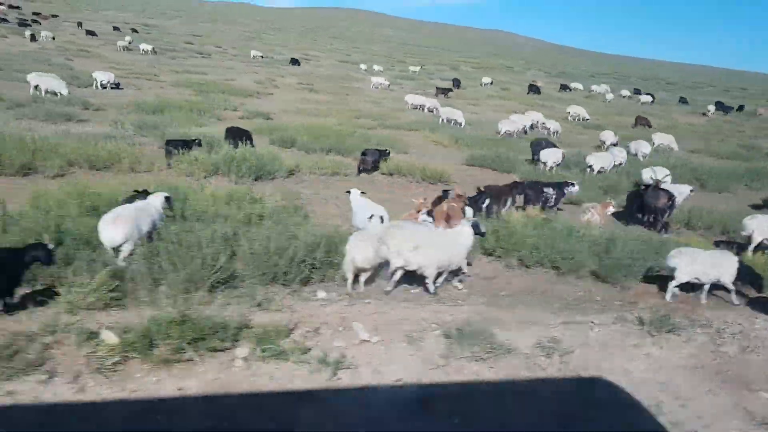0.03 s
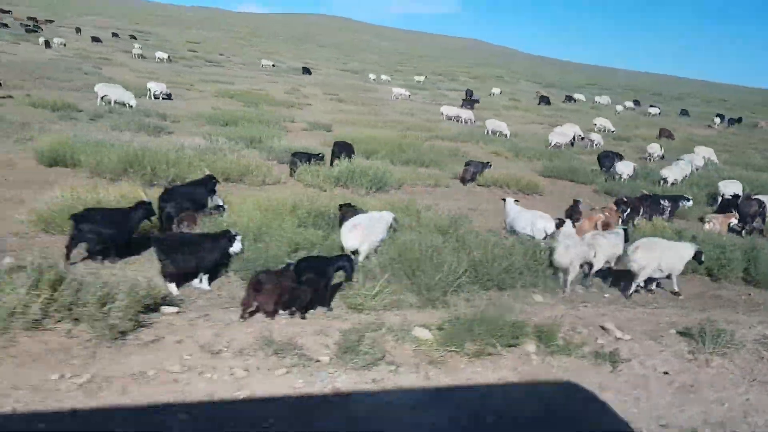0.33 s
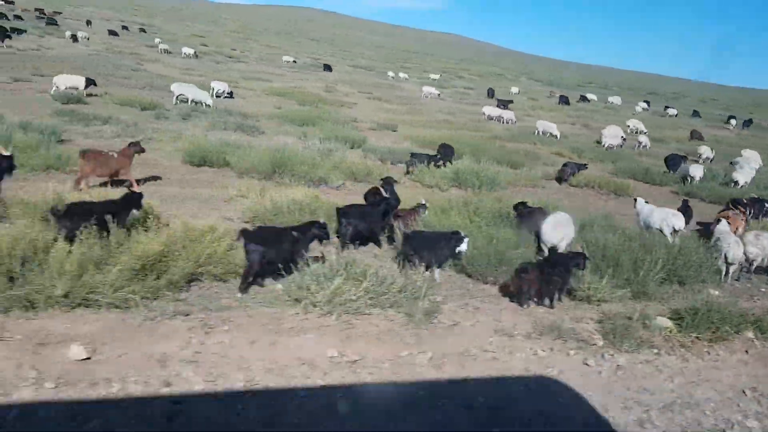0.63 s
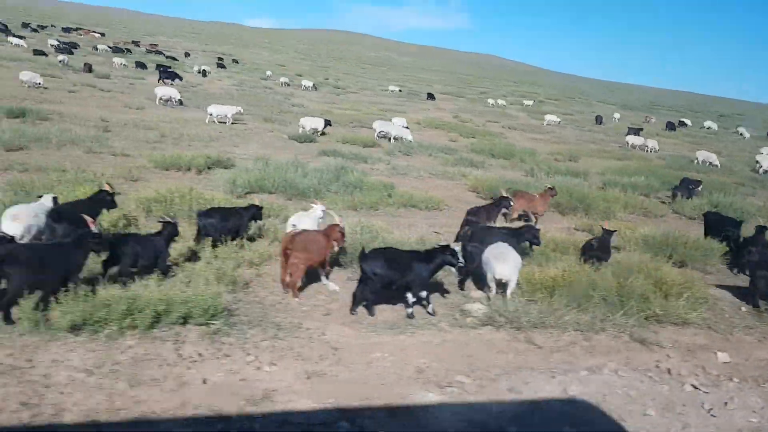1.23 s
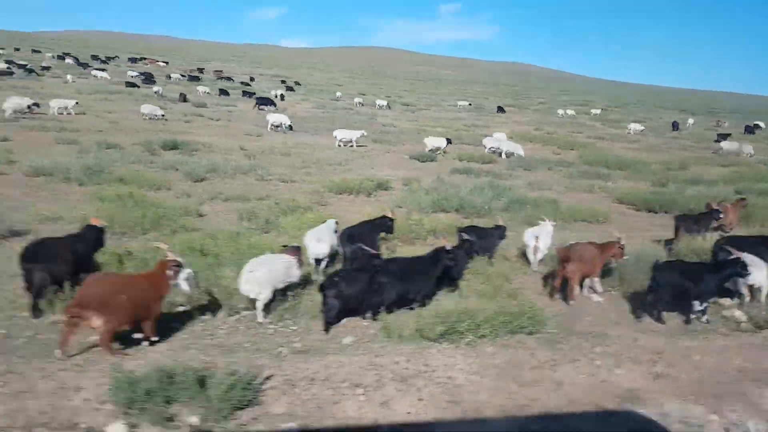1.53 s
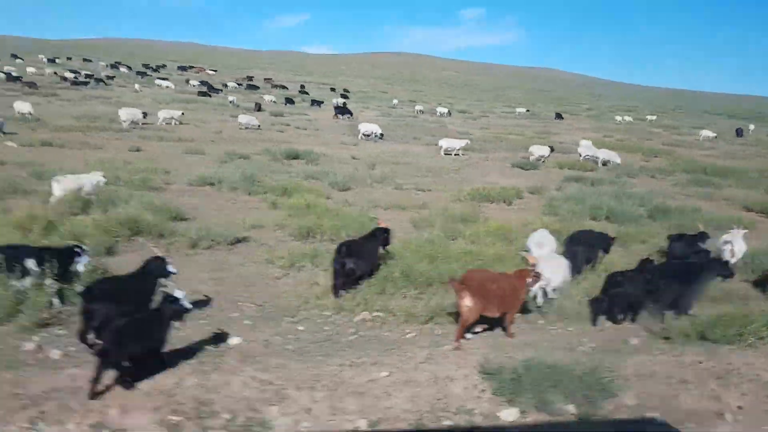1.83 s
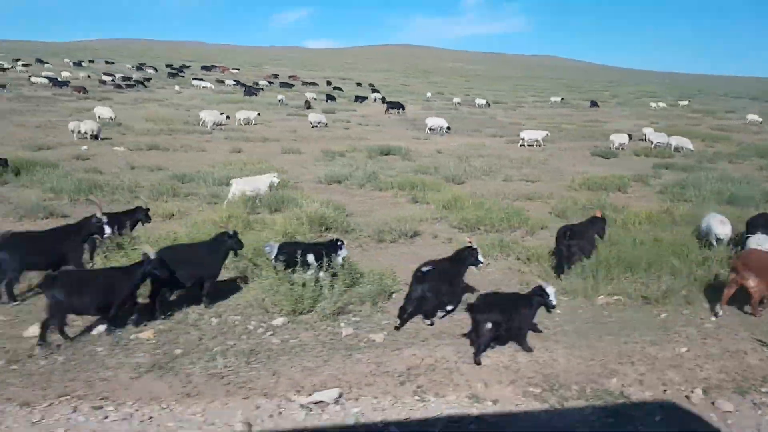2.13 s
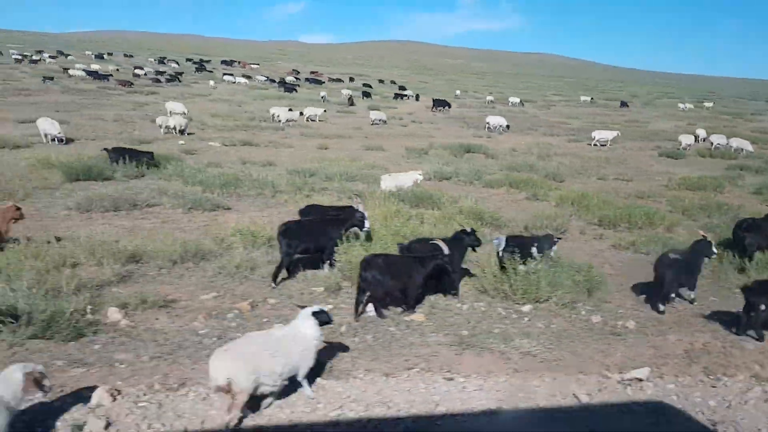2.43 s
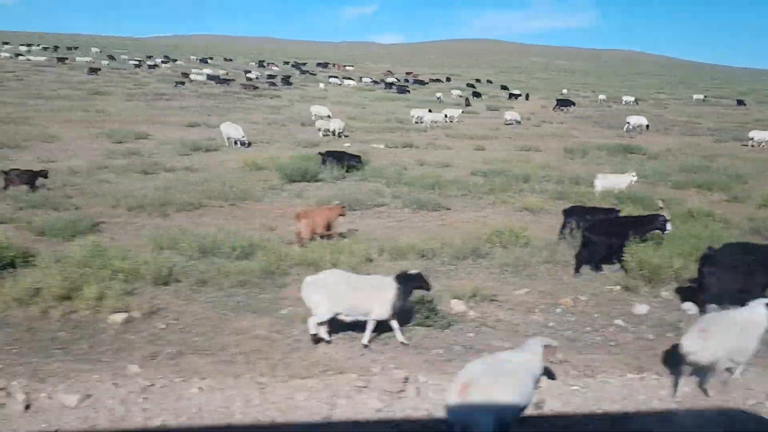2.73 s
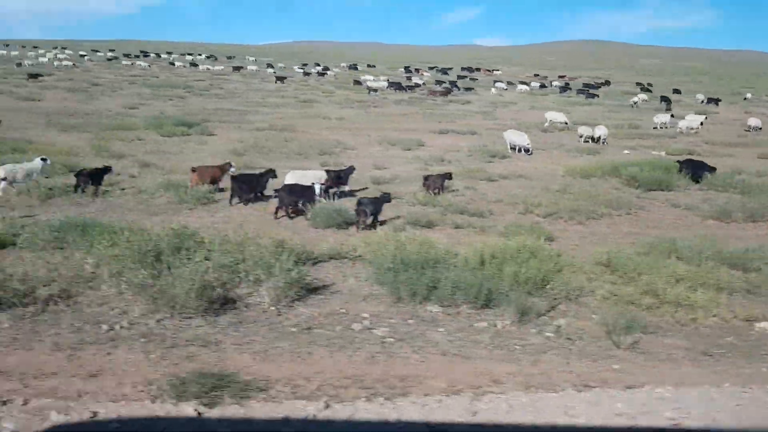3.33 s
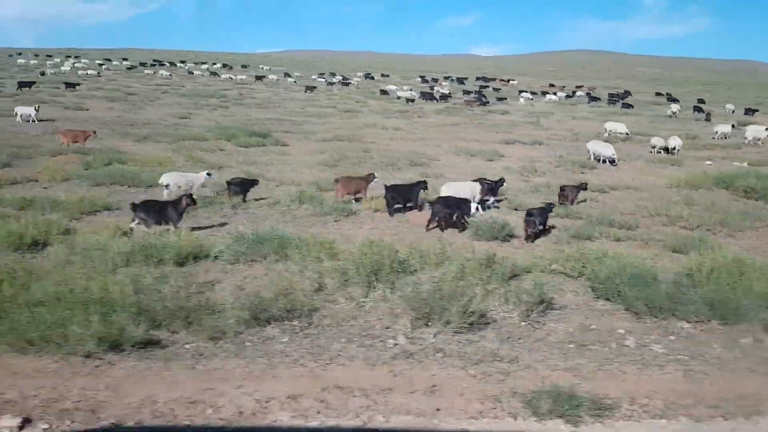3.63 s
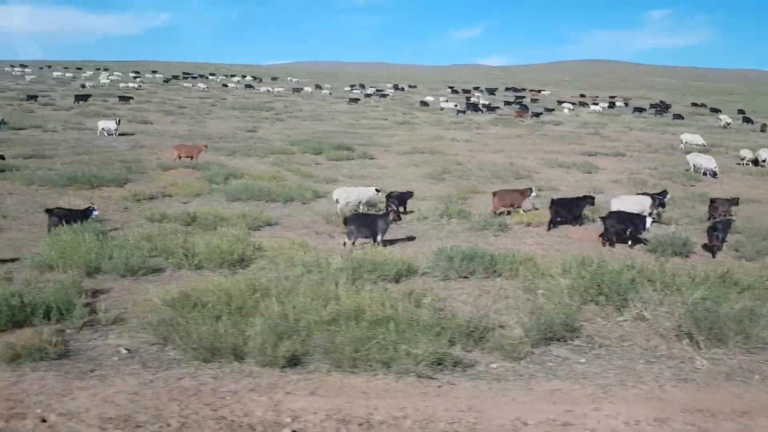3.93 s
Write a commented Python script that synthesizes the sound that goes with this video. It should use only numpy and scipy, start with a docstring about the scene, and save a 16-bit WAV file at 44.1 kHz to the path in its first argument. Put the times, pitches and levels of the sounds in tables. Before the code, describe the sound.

Low, booming rumble inside a car rolling over rough dirt, with light rattles and pops.

```python
"""Inside a car rolling slowly along a dirt track, the side window open on a pasture.
Ruts force the cabin air into a booming resonance and shake the body panels; air buffets the window.
The tyres roar and thud on stones, the suspension judders, and gearing and engine hum faintly.
Loose trim ticks and squeaks over a hiss of grit. Close to the microphone there are a few rustles,
and pressure steps at its ports make small pops and one sharp click."""
import sys
import numpy as np
from scipy import signal
from scipy.io import wavfile

SR = 44100
rng = np.random.default_rng(int(sys.argv[2]) if len(sys.argv) > 2 else 0)


def wav_out(sig):
    """Save sig, one row per channel (or a flat mono array), as 16-bit PCM at SR to the path in sys.argv[1]."""
    wavfile.write(sys.argv[1], SR, np.round(np.clip(np.atleast_2d(sig).T, -1, 1) * 32767).astype(np.int16))


N = 176400
T = np.arange(N) / SR

# Spectra give relative level per hertz; balance is left minus right.
# drive of the cabin boom by the ruts: t/s, level/dB
BOOM_LEVEL = [(0.04, -9.5), (0.05, -23), (0.53, -23), (0.69, -13), (0.77, -21.5), (0.85, -16.5),
              (0.91, -25.5), (0.93, -15.5), (1.2, -25), (1.36, -9), (1.39, -23), (1.5, -13.5),
              (1.55, -25.5), (1.62, -17), (2.08, -24), (2.16, -15.5), (2.3, -32), (2.33, -16.5),
              (2.61, -28), (2.64, -16), (2.68, -24), (2.83, -18), (2.95, -22.5), (2.97, -21.5),
              (3.16, -24.5), (3.21, -22.5), (3.24, -31.5), (3.33, -14), (3.36, -33), (3.53, -19),
              (3.6, -40.5), (3.71, -19), (3.74, -18), (3.96, -21)]
# centre of the boom, shifting with rut spacing: t/s, f/Hz
BOOM_PITCH = [(0, 82.3), (.35, 80.63), (.55, 73.1), (.78, 71.67), (.95, 76.35), (1.2, 81.36), (1.36, 68.23),
              (1.65, 69.3), (1.85, 66.5), (2.12, 86.18), (2.35, 79.57), (2.55, 78.27), (2.8, 81.16),
              (3.05, 77.4), (3.3, 77.14), (3.5, 82.2), (3.75, 89.66), (4, 75.2)]
# steady shaking of the panels: t/s, level/dB
PANEL_LEVEL = [(0, -25.5), (.5, -24.5), (.95, -25), (1.15, -24.5), (1.4, -24), (1.8, -25), (2.1, -26),
               (2.3, -28), (2.55, -27), (2.72, -27.5), (2.84, -29.5), (3.14, -27), (3.5, -26.5),
               (3.62, -31), (3.8, -27), (4, -25)]
# panel spectrum: f/Hz, level/dB
PANEL_SPECTRUM = [(60, -20.5), (90, 7.5), (115, -2), (150, -6), (200, -9.5), (255, -13.5), (325, -12),
                  (410, -24.5), (520, -35.5), (900, -72)]
# jolts on deep ruts: centre t/s, length/s, level/dB
JOLTS = [(0.13, 0.042, -28), (0.311, 0.094, -23.5), (0.722, 0.18, -30), (0.983, 0.11, -27.5),
         (1.561, 0.048, -23.5), (1.985, 0.038, -27), (2.412, 0.093, -23), (2.67, 0.043, -25.5),
         (2.979, 0.08, -21.5), (3.234, 0.053, -19.5), (3.319, 0.04, -23), (3.718, 0.027, -16),
         (3.822, 0.069, -25), (3.952, 0.047, -21)]
# jolt spectrum: f/Hz, level/dB
JOLT_SPECTRUM = [(75, -13.5), (105, -3), (150, 3), (195, -8), (255, -16.5), (330, -21.5), (500, -34.5)]
# buffeting at the window: f/Hz, level/dB
BUFFET_SPECTRUM = [(15, 1.5), (24, -5.5), (31, -9.5), (40, -4.5), (50, -11), (70, -27.5), (140, -41)]
# tyre roar: t/s, level/dB
ROAR_LEVEL = [(0, -31.5), (.7, -34.5), (1.4, -35), (2.1, -38), (2.6, -38.5), (2.87, -40.5), (3.5, -41),
              (4, -39)]
# roar spectrum: f/Hz, level/dB
ROAR_SPECTRUM = [(150, 15), (350, -1.5), (500, 0.5), (680, -4), (850, -8), (1100, -18.5), (1600, -37.5),
                 (3000, -33.5)]
# rough ground: centre t/s, length/s, groan level/dB, clatter level/dB
ROUGH_PATCHES = [(0.374, 0.15, -34.5, -45), (0.788, 0.039, -34, -40.5), (1.334, 0.033, -47.5, -46.5),
                 (1.57, 0.082, -30.5, -44), (1.856, 0.11, -34, -40.5), (2.245, 0.15, -33.5, -43),
                 (2.72, 0.13, -35, -40), (3.032, 0.057, -29.5, -41.5), (3.261, 0.057, -33.5, -42.5),
                 (3.737, 0.11, -33, -51)]
# low chassis modes: f/Hz, bandwidth/Hz, relative level/dB
GROAN_MODES = [(267, 31, -2.5), (319, 40, 1)]
# high chassis modes: f/Hz, bandwidth/Hz, relative level/dB
CLATTER_MODES = [(695, 26, 2.5), (799, 70, 4), (935, 50, -5.5), (1088, 110, -7), (1370, 36, -16.5)]
# stones under the tyres: t/s, level/dB
THUDS = [(0.261, -42), (0.706, -35.5), (0.778, -36), (1.328, -38), (3, -49)]
# thud spectrum: f/Hz, level/dB
THUD_SPECTRUM = [(250, 8.5), (550, 8), (850, -9.5), (1300, -5), (2500, -17)]
# knocks on the microphone: t/s, step level/dB, edge f/Hz, port (0 left, 1 right)
POPS = [(.009, -1.5, 1310, 1), (.0113, -17, 1600, 1), (.0272, -7.5, 5050, 1), (.0433, -4, 2030, 1),
        (.264, -8.5, 1930, 1), (.705, -10, 1800, 1), (1.7915, -12, 1500, 1), (1.8175, -5.5, 1674, 1),
        (2.12, -13.5, 1500, 1), (3.195, -12, 1400, 1), (3.2095, -12.5, 2530, 1), (2.6651, -4.5, 8000, 0)]
# gear whine, following road speed: t/s, f/Hz, level/dB
WHINE = [(0, 345.7, -41), (.3, 350.9, -38.5), (.62, 358.8, -34), (.8, 360.3, -39.5), (1.1, 361.4, -42.5),
         (1.5, 365, -47), (2.2, 362.3, -53), (3, 358.3, -54), (3.7, 355.5, -50.5), (4, 370.8, -44)]
# drone of the pulling engine: t/s, level/dB
DRONE_LEVEL = [(0, -35.5), (.45, -37.5), (.7, -32), (1.0, -32.5), (1.2, -34), (1.6, -45.5), (4, -46)]
# engine partials: ratio to the whine's frequency, relative level/dB
DRONE_PARTIALS = [(.317, 0.5), (.392, -3.5), (.572, -3.5), (1.59, -22.5), (1.87, -25.5)]
# ticks of loose trim: t/s, level/dB, balance/dB
TICKS = [(0.322, -40, 5), (.459, -50, 5), (.523, -37.5, 6), (0.551, -41, 2), (0.613, -43, -2),
         (0.654, -42, 0), (0.703, -49, -12), (.760, -43, 1), (0.855, -45.5, 4), (0.942, -48, 2),
         (1.078, -41, 9), (1.28, -46, 6), (1.671, -42, -5), (2.038, -41, -12), (2.488, -45, 15),
         (2.77, -40.5, -4), (3.117, -48, -10), (3.406, -46, 0)]
# tick spectrum: f/Hz, level/dB
TICK_SPECTRUM = [(500, -18), (1500, -1.5), (2500, 9), (4000, 0), (5800, -4), (8000, -5.5), (10000, -14.5),
                 (13000, -25), (17000, -17.5)]
# rubs beside the microphone: centre t/s, length/s, level/dB, balance/dB
RUSTLES = [(0.03, 0.023, -45, -19), (1.066, .04, -60.5, 14), (1.788, 0.1, -46, -2.5),
           (1.954, 0.027, -42.5, -23), (2.087, 0.082, -50, -3), (3.15, 0.03, -58, 5), (3.307, .015, -49, 0),
           (3.361, 0.033, -40, -15), (3.925, 0.049, -44, -7)]
# rustle spectrum: f/Hz, level/dB
RUSTLE_SPECTRUM = [(500, 1), (1000, -4.5), (1600, 0), (2300, 8.5), (3400, -12), (4800, -3), (7000, -24.5),
                   (9500, -18), (13000, -32.5), (17000, -40.5)]
# squeaks of seals and springs: centre t/s, length/s, f/Hz, level/dB
SQUEAKS = [(0.084, 0.0088, 3270, -52), (.145, 0.021, 3550, -58), (.28, .012, 3380, -59),
           (0.869, 0.024, 4250, -57.5), (.98, 0.015, 3050, -57), (3.153, 0.018, 6800, -61),
           (3.754, 0.098, 547, -42), (3.89, 0.016, 3110, -49.5)]
# hiss of grit: t/s, level/dB
HISS_LEVEL = [(0, -47.5), (.48, -51.5), (.6, -51), (1.08, -50.5), (1.15, -57), (1.24, -51), (1.3, -47),
              (1.42, -54), (1.5, -49.5), (1.87, -53), (1.91, -52.5), (2.2, -53.5), (2.46, -49), (2.55, -59),
              (2.63, -49.5), (2.87, -56), (2.96, -53.5), (3.1, -51), (3.27, -54.5), (3.5, -50.5),
              (3.56, -58.5), (3.68, -49.5), (3.85, -50.5), (4, -54.5)]
# hiss spectrum: f/Hz, level/dB
HISS_SPECTRUM = [(600, -12.5), (1200, 2.5), (1700, 2), (2250, 1.5), (3200, -7), (4200, -11.5), (5300, -13),
                 (7000, -21), (9000, -21), (12000, -32), (17000, -31.5)]
# even rush of air: f/Hz, level/dB
AIR_SPECTRUM = [(3500, -0.5), (5300, -1), (7000, -6.5), (9000, -6.5), (12000, -15.5), (17000, -15)]
# likeness of left and right noise: f/Hz, correlation
CORRELATION = [(30, 0.99), (100, 0.93), (180, 0.98), (340, 0.65), (700, 0.013), (1400, 0), (2800, 0),
               (5600, 0), (11000, 0.046)]
# sideways lean of the cabin noise: f/Hz, balance/dB
BALANCE = [(30, -2), (130, -0.5), (330, -2), (500, 4), (750, 5), (1200, -1.5), (2200, -2.5), (4500, 1.5),
           (9000, 5.5)]
# colouring by the microphone ports: f/Hz, gain/dB, Q
PORT_COLOUR = [(9100, -10.5, 1.27), (12700, 7.5, 3.1)]

LOW_BALANCE_DB = -2  # boom, groan and drivetrain lie slightly to the right


def from_db(db):
    """Amplitude ratio for a level in decibels."""
    return 10 ** (np.asarray(db) / 20)


def unit_rms(x):
    """Normalisation to unit mean power."""
    return x / np.sqrt(np.mean(x ** 2) + 1e-20)


def in_time(rows):
    """Linear interpolation of each column at every sample."""
    times, *columns = np.transpose(rows)
    return [np.interp(T, times, column) for column in columns]


def at_hz(points, hz):
    """Interpolation on a logarithmic frequency axis."""
    f, value = np.transpose(points)
    return np.interp(np.log(hz), np.log(f), value)


def pan(db):
    """Constant-power left and right gains for a level difference."""
    return unit_rms(from_db(np.array([[db], [-db]]) / 2))


def drift(corner_hz):
    """Random wander of unit rms: noise through a two-pole low-pass."""
    hop, settle = 40, 2000  # samples per step, steps discarded
    pole = np.exp(-2 * np.pi * corner_hz * hop / SR)
    white = rng.standard_normal(N // hop + settle + 2)
    slow = signal.lfilter([1], [1, -2 * pole, pole * pole], white)[settle:]
    return np.interp(np.arange(N) / hop, np.arange(len(slow)), unit_rms(slow))


def noise(spectrum, flicker_db, flicker_hz):
    """Partly correlated stereo noise of unit rms, in third-octave bands whose levels flicker."""
    edges = 14 * 2 ** (np.arange(32) / 3)
    white = rng.standard_normal((2, 2, N + SR // 2))
    shared, out = drift(flicker_hz), 0
    for k, (low, high) in enumerate(zip(edges, edges[1:])):
        hz, own = np.sqrt(low * high), drift(flicker_hz)
        if not spectrum[0][0] <= hz <= spectrum[-1][0]:
            continue
        bandpass = signal.butter(2, [low, high], "band", fs=SR, output="sos")
        mid, side = signal.sosfilt(bandpass, white[k % 2])[:, -N:]
        alike = at_hz(CORRELATION, hz)
        band = np.sqrt(1 + alike) * mid + np.sqrt(1 - alike) * side * [[1], [-1]]
        gain = from_db(at_hz(spectrum, hz) + flicker_db * (shared + own))
        out = out + gain * pan(at_hz(BALANCE, hz)) * band
    return unit_rms(out)


def swell(centre, length):
    """Gaussian envelope; the length spans two standard deviations."""
    return np.exp(-2 * ((T - centre) / length) ** 2)


def resonate(x, modes, detune=1):
    """Superposition of steep-skirted resonances, all detuned by one ratio; unit rms."""
    out = 0
    for hz, width, db in modes:
        b, a = signal.iirpeak(hz * detune, hz / (1.5 * width), fs=SR)
        out = out + from_db(db) * signal.lfilter(b, a, signal.lfilter(b, a, x + 1e-18))
    return unit_rms(out)


def cabin_boom():
    """Cavity resonance: road shocks keep the cabin air booming in a narrow, restless low band."""
    wander_hz, compression, gain_db = 18.7, 0.49, 1.35
    phase = 2 * np.pi * np.cumsum(in_time(BOOM_PITCH)[0]) / SR
    ring = (drift(wander_hz) + 1j * drift(wander_hz)) * np.exp(1j * phase)
    evened = ring.real / (np.abs(ring) ** 2 + .15) ** (compression / 2)
    return unit_rms(evened) * from_db(in_time(BOOM_LEVEL)[0] + gain_db) * pan(LOW_BALANCE_DB)


def body_rumble():
    """Forced vibration: the panels shake steadily and lurch on each deep rut."""
    lurch = sum(from_db(db) * swell(t, length) for t, length, db in JOLTS)
    jolts = lurch * noise(JOLT_SPECTRUM, flicker_db=1, flicker_hz=20)
    shake = noise(PANEL_SPECTRUM, flicker_db=0.14, flicker_hz=25)
    return jolts + shake * from_db(in_time(PANEL_LEVEL)[0])


def window_buffet():
    """Unsteady flow at the open window makes very low pressure fluctuations."""
    return noise(BUFFET_SPECTRUM, flicker_db=1, flicker_hz=6.3) * from_db(-28)


def tyre_roar():
    """Random excitation: rubber rolling on dirt radiates broadband noise."""
    return noise(ROAR_SPECTRUM, flicker_db=2.1, flicker_hz=23) * from_db(in_time(ROAR_LEVEL)[0])


def suspension_judder():
    """Modal ringing: dense shocks excite the chassis, at a slightly new pitch on each rough patch."""
    shocks_per_s, edge_s = 1500, 0.011
    out = np.zeros((2, N))
    for t, length, groan_db, clatter_db in ROUGH_PATCHES:
        near = np.abs(T - t) < .15
        gate = .5 + .5 * np.tanh((length / 2 - np.abs(T[near] - t)) / edge_s)
        shocks = (rng.standard_normal((2, N)) * (rng.random(N) < shocks_per_s / SR))[:, near]
        detune = 1 + .025 * rng.uniform(-1.1, 1)
        groan = from_db(groan_db) * resonate(shocks[0], GROAN_MODES, detune) * pan(LOW_BALANCE_DB)
        clatter = from_db(clatter_db) * resonate(shocks, CLATTER_MODES, detune) * pan(db=1)
        out[:, near] += gate * (groan + clatter)
    return out


def stone_thuds():
    """Damped impacts: stones strike the tyres with dull blows that decay exponentially."""
    attack_s, decay_s = 0.0014, 0.013
    blows = sum(from_db(db) * np.clip((T - t) / attack_s, 0, 1) * np.exp(-np.abs(T - t) / decay_s)
                for t, db in THUDS)
    return blows * noise(THUD_SPECTRUM, flicker_db=3, flicker_hz=30)


def port_pops():
    """Step response: a knock raises the pressure at one port, and it leaks away in milliseconds."""
    leak_hz, damping = 127, 0.9
    out = np.zeros((2, N))
    for t, db, edge_hz, port in POPS:
        age = np.maximum(T - t, 0)
        edge, phase = 2 * np.pi * edge_hz * age, 2 * np.pi * leak_hz * age
        rise = 1 - (1 + edge) * np.exp(-edge)
        leak = np.exp(-damping * phase) * (np.cos(phase) - damping * np.sin(phase))
        out[port] += from_db(db) * rise * leak
    return out


def drivetrain():
    """Phase locking: the engine's partials keep fixed ratios to one thin, wavering gear whine."""
    wobble, flutter_db = .005, 1.8
    hz, db = in_time(WHINE)
    phase = 2 * np.pi * np.cumsum(hz * (1 + wobble * drift(7.5))) / SR
    whine = np.sin(phase) * from_db(db + flutter_db * drift(15))
    drone = sum(np.sin(ratio * phase) * from_db(partial_db + flutter_db * drift(4.8))
                for ratio, partial_db in DRONE_PARTIALS)
    return np.sqrt(2) * (whine + drone * from_db(in_time(DRONE_LEVEL)[0])) * pan(LOW_BALANCE_DB)


def trim_and_grit_ticks():
    """Impact transients: a few clear ticks of trim among a Poisson stream of faint ones from grit."""
    grit_per_s, attack_s, decay_s = 66, 0.00029, 0.0042
    grit_db = -59 + 3.5 * np.minimum(rng.exponential(1, N), 4)
    hits = np.ones((2, 1)) * from_db(grit_db) * (rng.random(N) < grit_per_s / SR)
    for t, db, balance in TICKS:
        hits[:, int(t * SR)] += from_db(db) * pan(balance)[:, 0]
    age = T[:SR // 10]
    shape = np.minimum(age / attack_s, 1) * np.exp(-np.maximum(age - attack_s, 0) / decay_s)
    envelope = signal.fftconvolve(hits, shape[None])[:, :N]
    return envelope * noise(TICK_SPECTRUM, flicker_db=2.5, flicker_hz=8.3)


def rustles():
    """Friction noise: brief grainy rubs, mostly on the right."""
    strokes = sum(from_db(db) * swell(t, length) * pan(balance) for t, length, db, balance in RUSTLES)
    return strokes * noise(RUSTLE_SPECTRUM, flicker_db=3, flicker_hz=240)


def squeaks():
    """Friction tones of seals and springs, made raspy by fast random frequency modulation."""
    warped_time = np.cumsum(1 + .06 * drift(corner_hz=280)) / SR
    return np.sqrt(2) * sum(from_db(db) * swell(t, length) * np.sin(2 * np.pi * hz * warped_time)
                            for t, length, hz, db in SQUEAKS)


def grit_hiss():
    """Resonant colouring: one narrow cabin mode tints the hiss of grit, which lulls on smooth ground."""
    ring_hz, width_hz, ring_db = 2200, 220, -10.5
    ring = from_db(ring_db) * resonate(rng.standard_normal((2, N)), [(ring_hz, width_hz, 0)])
    grit = noise(HISS_SPECTRUM, flicker_db=2, flicker_hz=19)
    return (grit + ring * pan(at_hz(BALANCE, ring_hz))) * from_db(in_time(HISS_LEVEL)[0])


def air_rush():
    """Stationary flow noise: a faint, even rush of air under the lulls."""
    return noise(AIR_SPECTRUM, flicker_db=0, flicker_hz=20) * from_db(-67.5)


def scene():
    """Linear superposition of all sources at the window."""
    ride = cabin_boom() + body_rumble() + window_buffet() + tyre_roar() + suspension_judder()
    ride = ride + stone_thuds() + port_pops() + drivetrain()
    return ride + trim_and_grit_ticks() + rustles() + squeaks() + grit_hiss() + air_rush()


def record(dry):
    """Filtering: the ports colour the treble; a very short end fade and a steep low-pass follow."""
    fade_s, cutoff_hz = .004, 15800
    for hz, db, q in PORT_COLOUR:
        dry = dry + (from_db(db) - 1) * signal.lfilter(*signal.iirpeak(hz, q, fs=SR), dry)
    dry = dry * np.minimum((T[-1] - T) / fade_s, 1)
    return signal.sosfilt(signal.ellip(10, .1, 80, cutoff_hz, fs=SR, output="sos"), dry)


dry = scene()
out = record(dry)
wav_out(out)
```